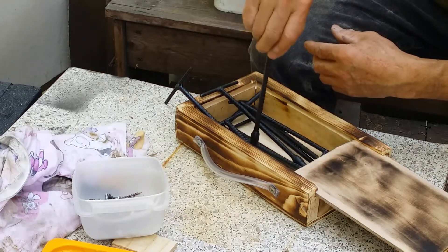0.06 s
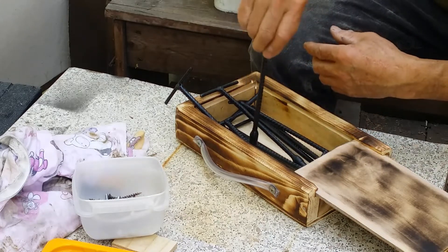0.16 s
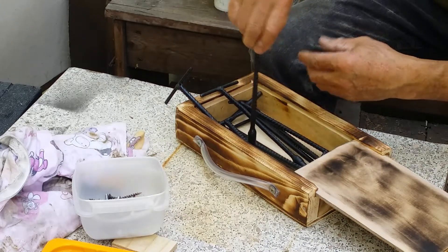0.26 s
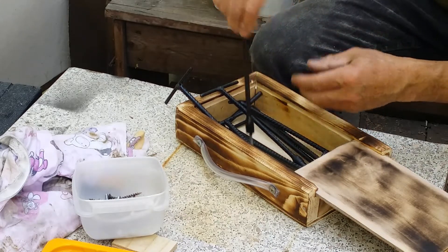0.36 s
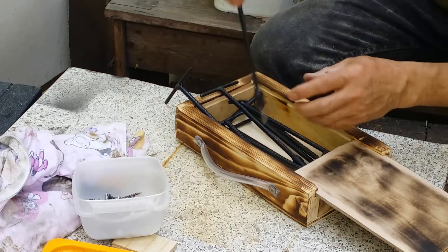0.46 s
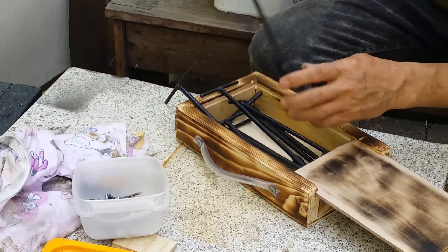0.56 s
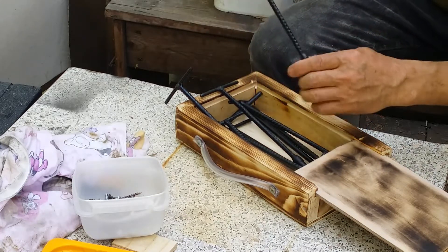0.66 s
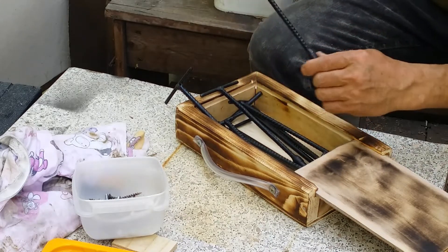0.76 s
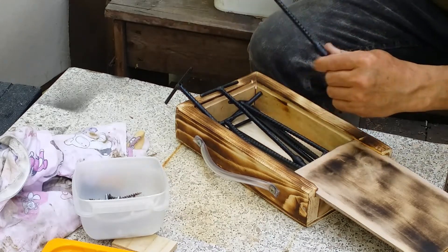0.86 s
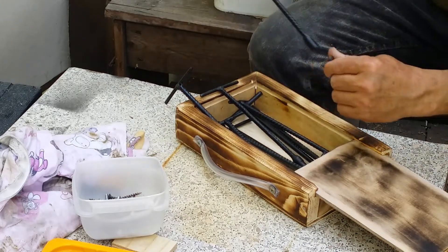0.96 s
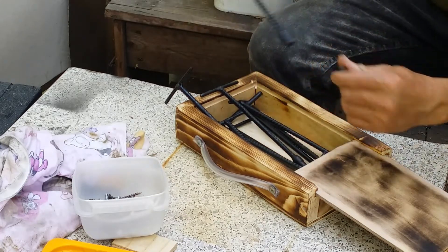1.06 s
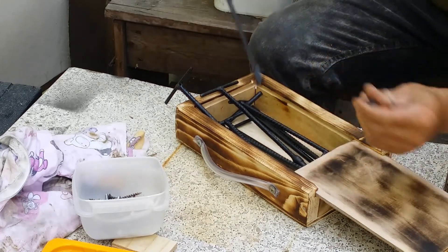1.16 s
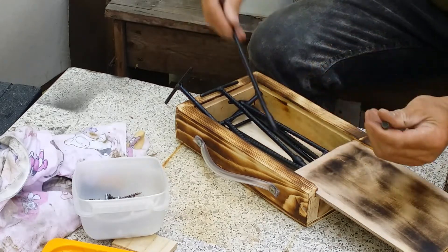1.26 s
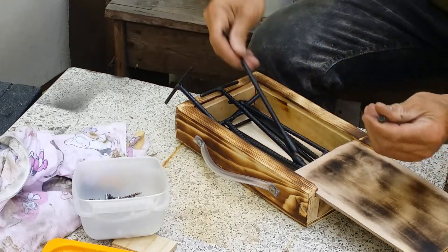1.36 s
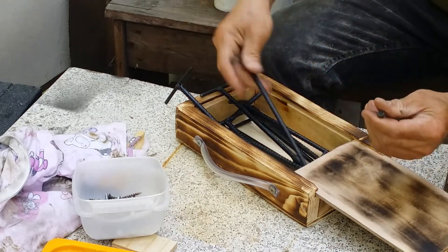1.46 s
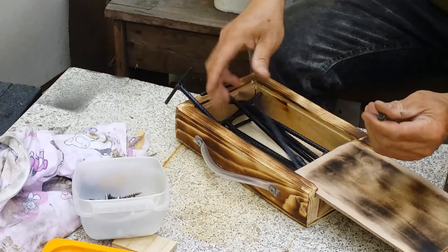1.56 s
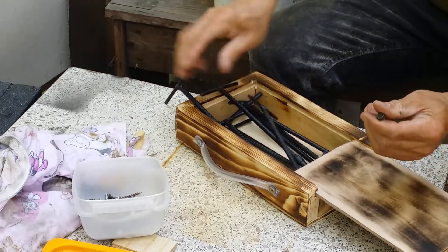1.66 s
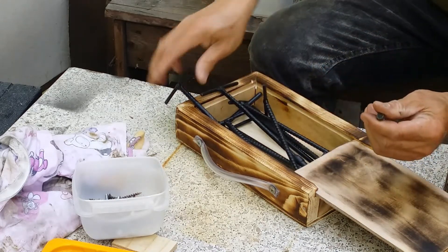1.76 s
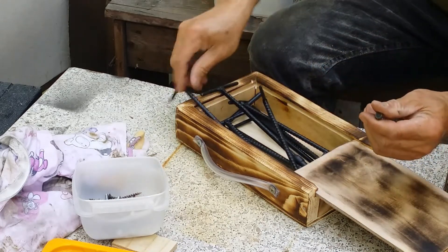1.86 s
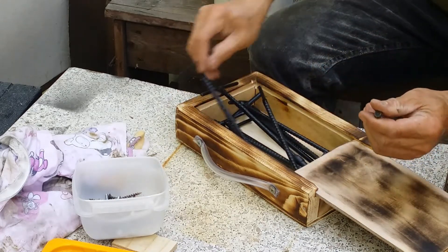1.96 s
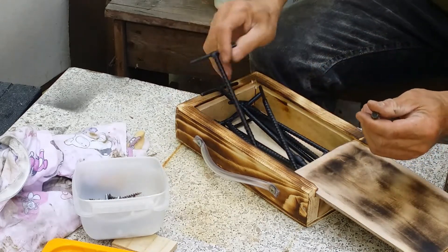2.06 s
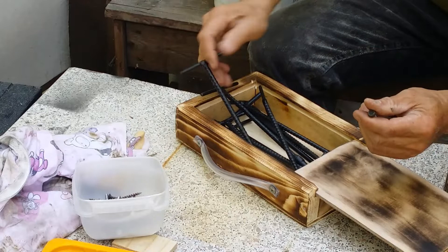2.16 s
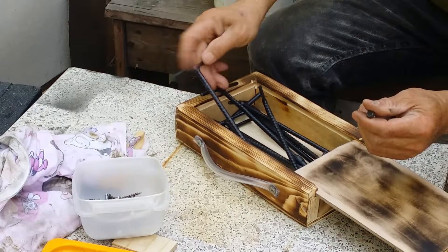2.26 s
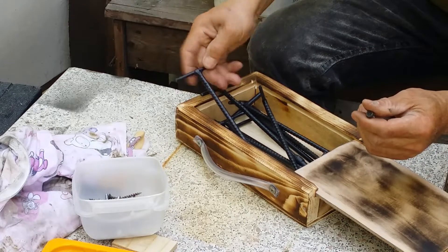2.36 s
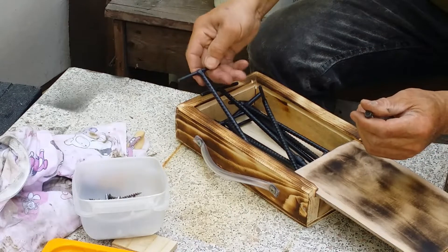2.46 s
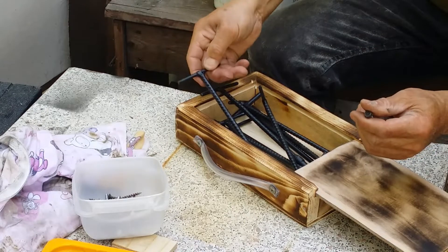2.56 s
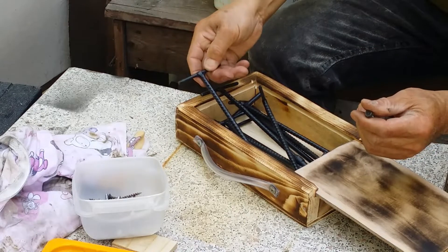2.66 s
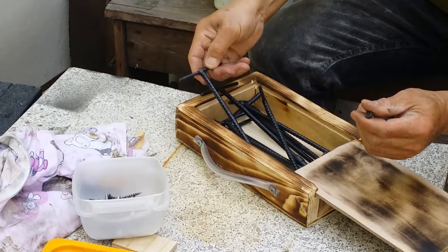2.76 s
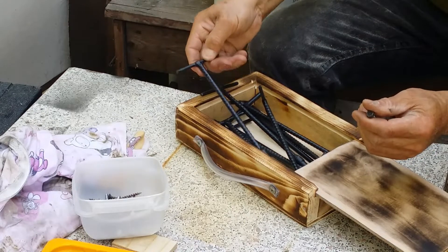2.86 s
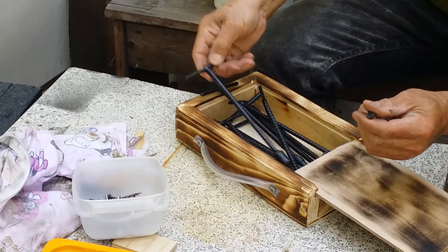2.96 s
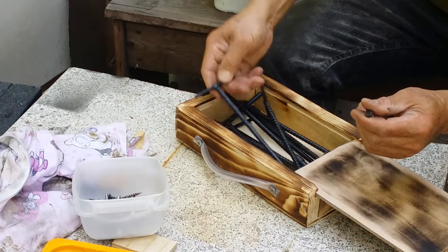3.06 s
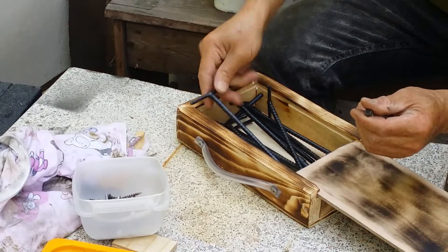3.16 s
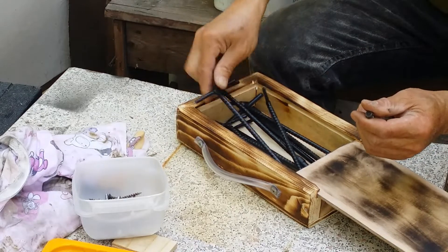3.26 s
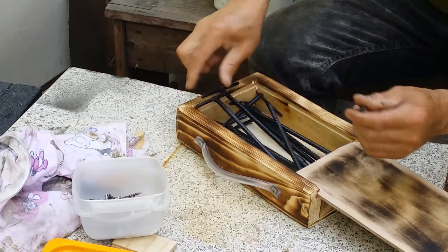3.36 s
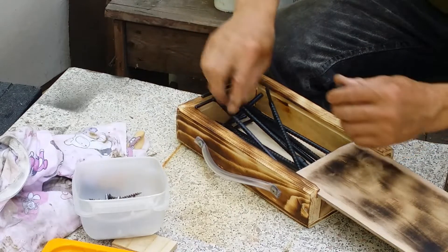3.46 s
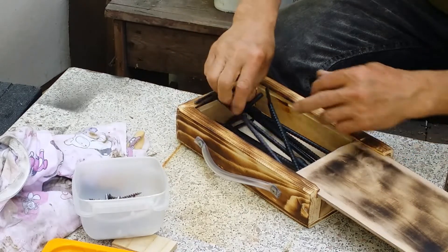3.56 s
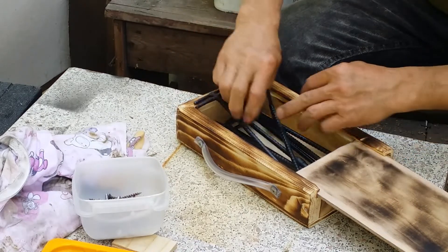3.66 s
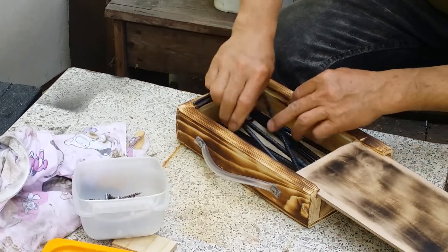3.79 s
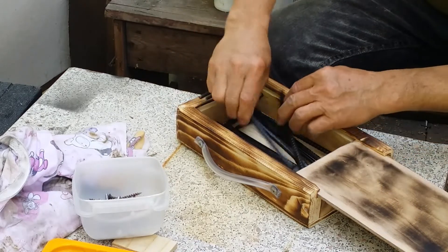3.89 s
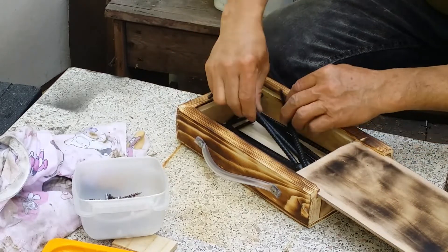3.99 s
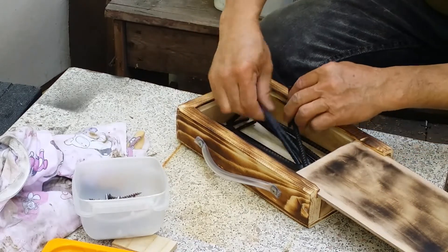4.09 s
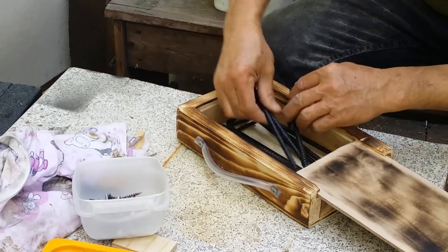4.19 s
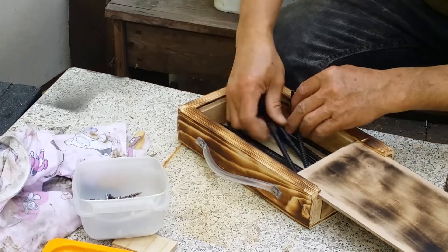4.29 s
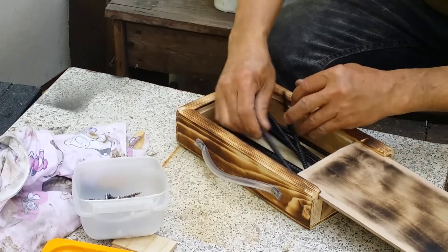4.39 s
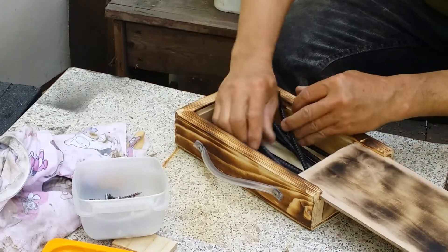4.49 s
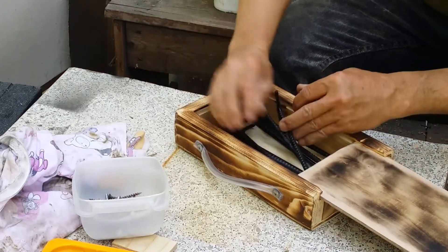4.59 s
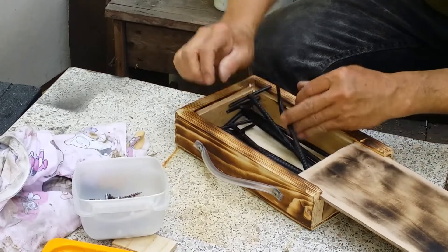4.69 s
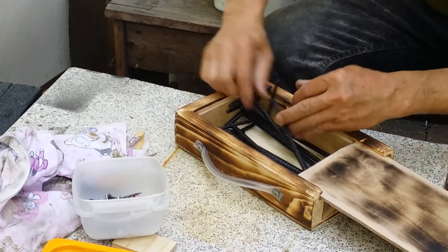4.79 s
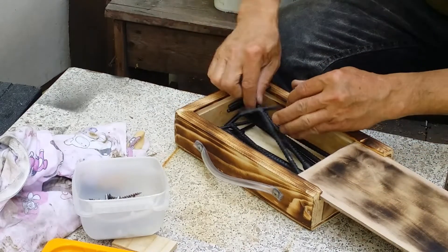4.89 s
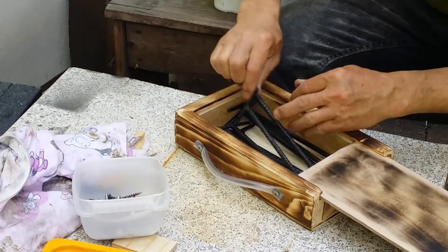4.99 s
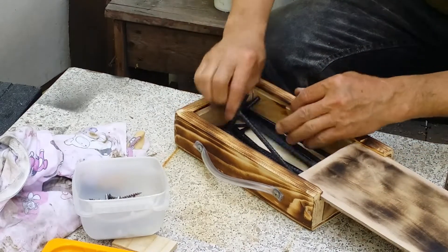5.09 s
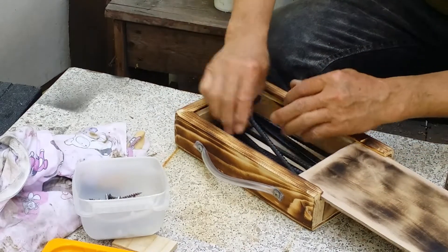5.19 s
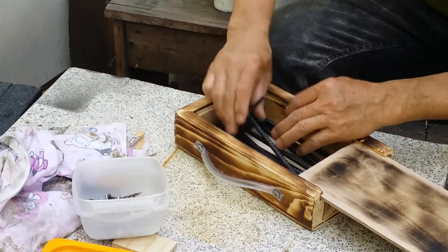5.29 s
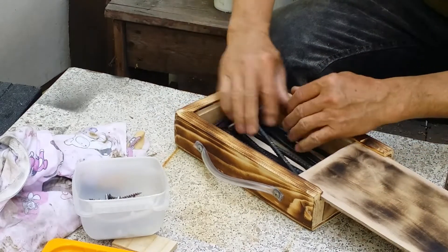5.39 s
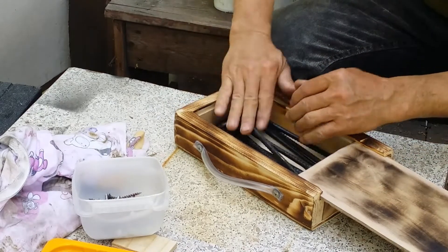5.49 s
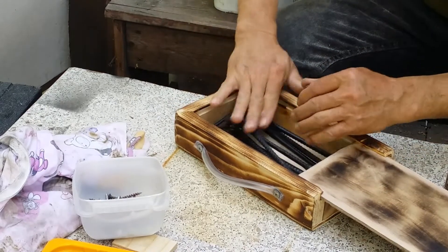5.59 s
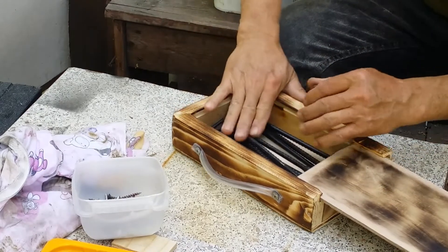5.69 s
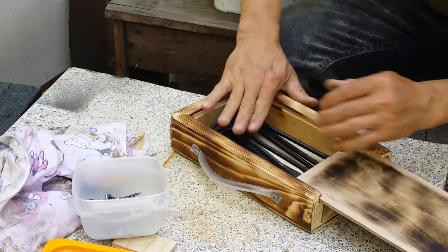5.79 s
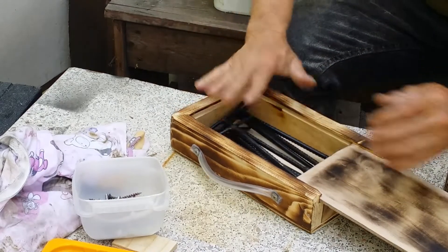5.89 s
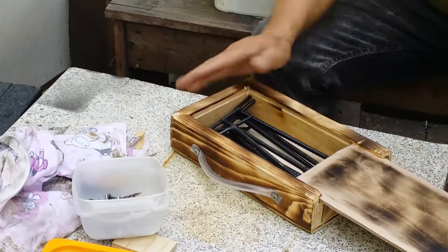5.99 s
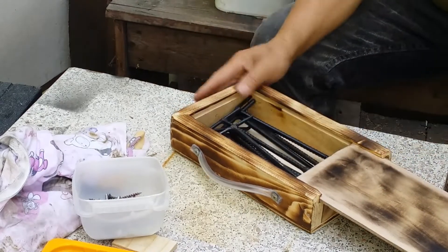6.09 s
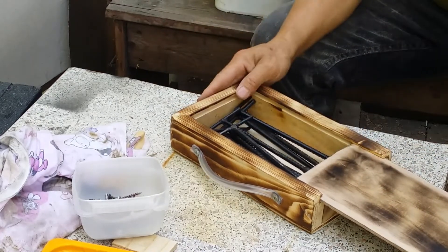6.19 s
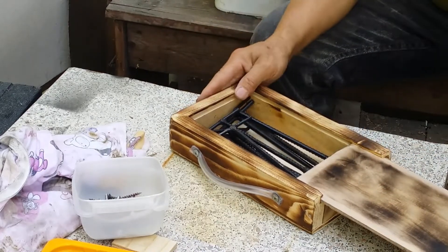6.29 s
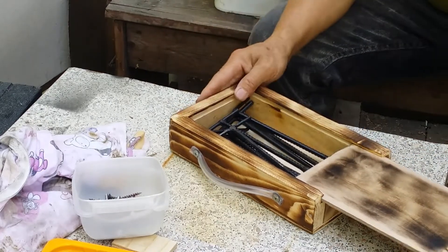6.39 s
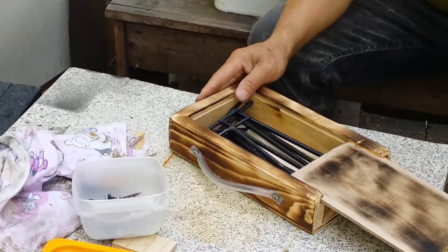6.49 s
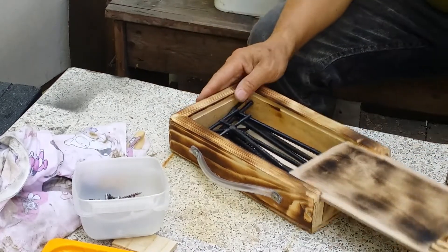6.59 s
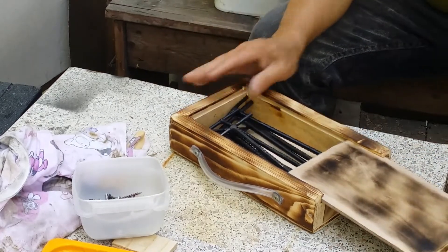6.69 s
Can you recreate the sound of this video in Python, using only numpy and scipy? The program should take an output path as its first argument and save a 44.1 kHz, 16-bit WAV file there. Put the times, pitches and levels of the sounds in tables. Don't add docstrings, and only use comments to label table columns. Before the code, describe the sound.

A quiet workshop, near silent: low soft hush, a barely audible dull knock at the start, distant rising bird whistles around 0.6 to 1.1 seconds and faint hand brushing. At about 1.65 steel rods hit a wooden box close by: sharp clacks, a strong strike at 1.73 with a clear ring lasting half a second, and chattering scrape until 2.1. A lull follows, with soft brushing at 2.5 and a bird at 2.8. Small clinks resume at 3.15, then a very sharp bright crack near 3.48. More clinks at 3.7, a heavy knock at 4.08, rubbing and rattling to 4.5, and a single clack at 4.73. From 4.93 to 5.9 comes dense clatter with scraping, woody thuds and low table booms; a bird whistles faintly at 5.4. Then quiet, light hand brushing, and small knocks from 6.4 to 6.7. Echo is short and dry.

```python
import sys
import numpy as np
from scipy import signal
from scipy.io import wavfile
from scipy.ndimage import uniform_filter1d

SR = 44100
rng = np.random.default_rng(int(sys.argv[2]) if len(sys.argv) > 2 else 0)


def amp(db):
    return 10 ** (np.asarray(db, float) / 20)


def write(x):
    x = np.atleast_2d(x).T
    wavfile.write(sys.argv[1], SR, np.round(np.clip(x, -1, 1) * 32767).astype(np.int16))


N = 297234

# pitch_hz, level_db (per Hz)
AIR_COLOUR = [(15, -45), (25, -14), (62, -18), (99, 7), (195, -11), (270, 4), (344, -9), (489, -5),
              (531, -22), (575, -7), (1890, -16.5), (4870, -21.5), (5880, -14.5), (9840, -27),
              (14800, -23.5), (16000, -49)]
# time_s, level_db
AIR_LEVEL = [(0, -68), (1.5, -65), (2.4, -61.5), (6.0, -60.5), (6.74, -60.5)]
# pitch_hz, likeness (-1 to 1)
AIR_LIKENESS = [(60, 1), (240, 0.74), (950, -0.11), (3770, -0.16), (15000, -0.047)]
# pitch_hz, level_db (per Hz)
STEEL_COLOUR = [(530, -34), (900, 3), (1920, -0.5), (3910, -1), (4570, -2), (6640, -4.5), (8870, -20.5),
                (10900, -24), (12300, -39), (14000, -25), (16000, -36)]
# pitch_hz, width_hz, level_db
BOX_PANELS = [(125.2, 5.1, -23), (167.4, 7, -23), (254, 81, -4), (277, 50, -4.5), (395, 33.4, -10.5),
              (477, 58, -1.5), (668, 40, -11.5), (801, 83, 0), (1009, 116, 0.5), (1300, 137, -2.5)]
# start_s, crack_db, box_db, rebound_t60_s, tilt_db (per octave)
DROPS = [(0.0455, -45, -45, 0.059, 0.6), (1.5993, -42.5, -57, 0.036, -6.5), (1.6602, -31, -36, 0.072, 0.5),
         (1.7001, -43, -42, 0.27, -2), (1.732, -18, -30.5, 0.052, -.1), (1.9494, -41.5, -49, 0.022, 0.2),
         (2.0257, -39, -37, 0.05, -2.5), (2.361, -58.5, -60.5, 0.1, -1), (2.9503, -50, -84, 0.064, -0.5),
         (2.9891, -53, -57, 0.2, -2), (3.1387, -38.5, -64, 0.054, 0), (3.2114, -28.5, -59, 0.092, -4),
         (3.412, -50, -59, 0.032, -6), (3.6891, -28.5, -42.5, 0.09, -.1), (3.9827, -39, -41.5, 0.037, -1.5),
         (4.057, -31, -38.5, 0.17, 0), (4.0783, -13, -29, 0.036, 1), (4.2023, -40.5, -44.5, 0.15, -3),
         (4.257, -52, -39.5, 0.032, 2)]
# start_s, crack_db, box_db, rebound_t60_s, tilt_db (per octave)
PUSHES = [(4.3474, -26, -34, 0.1, -3), (4.388, -28.5, -54, 0.053, 0.8), (4.4084, -39, -44, 0.1, 2),
          (4.5188, -48, -38.5, 0.026, -3), (4.9309, -27, -42, 0.042, 0.2), (4.9878, -24, -40, 0.068, 1.5),
          (5.0304, -21.5, -32.5, 0.035, 1), (5.0447, -22, -35, 0.031, 0), (5.3277, -25, -35.5, 0.03, 3),
          (5.4651, -35, -36.5, 0.026, 0.2), (5.6088, -37, -39, 0.062, 1),
          (5.6292, -35.5, -34.5, 0.029, -.1), (5.675, -40, -40, 0.033, -.1),
          (5.6885, -23, -32, 0.025, -0.5), (5.7107, -21.5, -37.5, 0.05, -1.5),
          (5.7722, -26, -36, 0.047, -2), (5.8002, -24.5, -39, 0.052, -0.5), (6.3678, -48, -81, 0.036, 1),
          (6.4082, -50.5, -48.5, 0.033, -.1), (6.6252, -34, -39.5, 0.074, 0), (6.7294, -43, -44, .08, -.1)]
# start_s, crack_db, box_db, rebound_t60_s, tilt_db (per octave)
CLINKS = [(1.641, -22.5, -47, 0.032, -2), (1.7891, -28, -52, 0.078, -0.3), (1.8099, -35, -43, 0.033, 1),
          (1.8488, -37, -76, 0.055, -.1), (1.9101, -35, -43.5, 0.068, 0.3), (3.1575, -46, -75, 0.12, -2),
          (3.1983, -41.5, -47.5, 0.028, -1), (3.2197, -52, -36, 0.032, -.1), (3.3389, -55, -53, .046, -.1),
          (3.4615, -31, -43, 0.077, -.1), (3.478, -19, -61, 0.047, 1), (3.5023, -30.5, -41.5, 0.088, 1.5),
          (3.682, -42, -55, .03, -.1), (3.7184, -33.5, -43.5, 0.073, 1), (3.7574, -31, -50, 0.03, 0.3),
          (3.7948, -38.5, -62, 0.088, -.1), (4.0304, -48, -66, 0.1, -.1), (4.3136, -30.5, -42, 0.097, 0.3),
          (4.3323, -27, -47, 0.026, 0.5), (4.4352, -23, -34, .11, -2), (4.728, -22, -33.5, 0.037, -.1),
          (4.957, -29, -65, 0.33, -1), (5.0732, -21, -36, 0.095, -0.3), (5.099, -30, -44, .05, -0.5),
          (5.1989, -25, -30, 0.05, -1), (5.238, -22, -39, 0.09, 0.3), (5.3488, -26.5, -38, 0.076, 1),
          (5.529, -26, -35, .03, 3), (5.5325, -19.5, -29, 0.044, 1), (5.5487, -26.5, -33, 0.053, 1),
          (6.5132, -47.5, -66, 0.3, -0.2)]
# crack_centre_hz, sparkle_db
DROP_COLOUR, PUSH_COLOUR, CLINK_COLOUR = (1620, -2.5), (1730, 2.6), (4540, 3.2)
# start_s, peak_db, centre_hz
SNAPS = [(1.6395, -24, 6660), (1.731, -18.5, 3840), (3.4625, -18.5, 4400), (3.477, -7.5, 5330),
         (3.503, -21, 5460), (3.6882, -28.5, 4900), (4.0575, -27, 6610), (4.0776, -17, 2200),
         (4.4363, -24, 6620), (4.7277, -24, 6650), (5.0728, -23, 4630), (5.1994, -22, 4460)]
# start_s, length_s, first_pitch_hz, sweep_db, closing_flick_db
WHISTLES = [
    (0.606, 0.14, 3100, -54, -57),
    (0.815, 0.093, 1380, -63, -43),
    (1.065, 0.058, 2440, -62.5, -49),
    (2.786, .13, 3040, -55, -53.5),
    (5.381, 0.086, 3050, -47, -48),
]
# middle_s, length_s, hiss_db, rustle_db
BRUSHES = [
    (0.93, 0.54, -71, -69.5),
    (2.548, 0.39, -68, -67),
    (4.266, 0.11, -49, -50.5),
    (4.646, 0.28, -61.5, -55),
    (4.824, 0.25, -78, -58),
    (5.956, 0.09, -57.5, -63),
    (6.107, 0.29, -116, -84),
    (6.282, 0.14, -62.5, -66),
    (6.389, 0.098, -57.5, -61.5),
    (6.562, 0.15, -59, -56.5),
]
# pitch_hz, level_db, t60_s
LONG_ROD = [(3800, -8, .09), (4520, -7, .15), (4689, 0, .28), (4800, -7, .15), (4969, -2, .78),
            (5070, -7, .15), (7590, -7, .25)]
STOUT_ROD = [(6620, -3, .3), (7570, -4, .25), (9775, -11, .4), (10880, -7, .3), (10540, -14, .12),
             (13470, -17, .3), (14280, -22, .25)]
BENT_ROD = [(1590, -18, .15), (2900, -18, .3), (3952, 0, .6), (6616, -3, .7)]
LOOSE_ROD = [(4253, -3, 1.1)]
SHORT_ROD = [(4900, 11.5, 0.067), (6800, 6, 0.16), (9700, -0.5, 0.29), (11200, -7, 0.28),
             (13900, -18, 0.075)]
FLAT_ROD = [(4100, -8, .1), (6640, -4, .25), (9700, -11, .25), (13560, -1, .2), (13830, -3, .2)]
THIN_ROD = [(7230, -2, .14), (10780, 2, 0.11), (11970, -9, 0.13), (13610, -6, 0.092), (14370, -3, 0.1)]
# pitch_hz, level_db, t60_s
PINNED_ROD = [(505.5, -10, 0.14), (850, -15, .15), (1044, -0.5, 0.11), (1367, -5, .15), (2200, -4, 0.17),
              (3639, -10, 0.13), (5841, -14, .12)]
PINCHED_ROD = [(5480, -3.5, .13), (6621, -3, 0.24), (7585, -11, .16), (9740, -22, 0.43), (10410, -15, .12),
               (14350, -14, 0.11), (14910, -14, .07)]
TIPPED_ROD = [(1013, -6, .15), (1370, -4, 0.097), (3230, -9, .08), (4888, -3, 0.44), (7300, -8, .09),
              (7607, -14.5, 0.36), (10910, -16, .3), (13600, -29.5, .2)]
CROSSED_ROD = [(3650, -3, 0.071), (4969, -3, 0.21), (5060, -1, .25), (6670, -6.5, .5), (7250, -10, .25),
               (7585, -2.5, 0.22), (9814, -8, .16), (10930, -14, .3), (13550, -19, .3), (14930, -14, .07)]
# start_s, level_db, hold_s (until damped), tilt_db (per octave, from the place struck), rod
FREED = [(1.641, -49.5, .07, 0.5, SHORT_ROD), (1.732, -32.5, 0.12, 5, STOUT_ROD),
         (1.731, -36.5, .55, -3, LONG_ROD), (1.79, -40, 0.033, -5, LONG_ROD),
         (1.745, -46, .22, -6, BENT_ROD), (1.909, -43.5, 0.024, 21.5, LONG_ROD),
         (3.155, -50, 0.077, 11, LONG_ROD), (3.213, -59, 0.23, -6, LOOSE_ROD),
         (3.213, -40, 0.076, 0.3, TIPPED_ROD), (4.079, -29, .05, -.1, PINNED_ROD),
         (3.757, -45.5, .06, -1, CROSSED_ROD), (3.719, -38.5, 0.04, -.1, CROSSED_ROD),
         (3.796, -50.5, 0.05, 4, CROSSED_ROD), (3.81, -53, .12, 3, BENT_ROD),
         (4.438, -33, 0.029, -5, STOUT_ROD), (4.727, -37.5, 0.012, 3.5, FLAT_ROD),
         (3.479, -30.5, 0.07, -1, PINCHED_ROD), (4.958, -44, 0.087, 7, STOUT_ROD),
         (5.074, -50, 0.11, -32, SHORT_ROD), (5.239, -37.5, .08, 1.5, THIN_ROD),
         (5.532, -48, 0.03, 3, FLAT_ROD), (4.96, -52, .08, 5, FLAT_ROD), (5.71, -48.5, 0.13, 24, BENT_ROD)]
# start_s, end_s, chatter_db (steel), rumble_db (box), change_db (by the end)
HANDLING = [(1.652, 2.127, -48.5, -42.5, -19.5), (2.877, 3.1, -88, -70, 1), (3.145, 3.447, -62, -50, -17),
            (3.69, 3.943, -51.5, -46, -17.5), (3.964, 4.526, -61.5, -52, -4),
            (4.938, 5.146, -56.5, -48.5, 1.5), (5.195, 5.428, -61, -52.5, 5.5),
            (5.46, 5.725, -61, -58, 11.5), (5.753, 5.899, -48, -43.5, -9), (6.4, 6.635, -83, -86, 24),
            (6.625, 6.74, -54.5, -47, -13)]
# start_s, peak_db, panel_hz
THUDS = [
    (1.6999, -24.5, 567),
    (2.0245, -31.5, 474),
    (4.077, -43, 1050),
    (4.387, -32.5, 606),
    (4.407, -26, 745),
    (5.042, -25, 840),
    (5.199, -32.5, 270),
    (5.773, -27.5, 298),
    (5.8, -39, 700),
]
# start_s, level_db, pitch_hz, t60_s
BOOMS = [
    (1.742, -44, 123, .9),
    (2.029, -57, 107, .9),
    (3.701, -51, 132, .9),
    (4.078, -35, 270, .16),
    (4.135, -46, 130, .3),
    (4.258, -45, 490, .12),
    (4.728, -37, 495, .12),
    (5.2, -42, 270, .2),
    (5.6, -35.5, 222.3, .3),
    (5.799, -48, 97.8, .9),
]
# start_s, peak_db, centre_hz
TICKS = [(1.76, -28, 4700), (1.787, -28, 3900), (1.803, -30, 4800), (3.2125, -44, 12500),
         (3.478, -24, 14800), (3.49, -23, 4300), (3.721, -31, 5000), (3.757, -29, 5000), (4.03, -43, 5000),
         (4.0785, -22, 5800), (4.3136, -32, 6300), (4.387, -30, 5500), (4.407, -35, 6000),
         (4.9885, -23, 5200), (5.03, -28, 6200), (5.322, -34, 7300), (5.688, -29, 4500), (5.772, -30, 4800)]


def evened(x):
    return x / np.sqrt(np.mean(x ** 2) + 1e-20)


def read(points, hz):
    f, value = np.transpose(points)
    return np.interp(np.log(hz + 1), np.log(f + 1), value)


def add(mix, s, sound):
    part = mix[:, round(s * SR):][:, :sound.shape[1]]
    part += sound[:, :part.shape[1]]


def air():
    frames, hz = N // 256 + 5, np.fft.rfftfreq(1024, 1 / SR)
    a, b, c, d, patches = rng.standard_normal((frames, 513, 5)).T
    patches = uniform_filter1d(patches, 10, 0)
    patches = evened(uniform_filter1d(patches, 14, 1))
    same = np.clip(read(AIR_LIKENESS, hz), -1, 1)[:, None]
    left = a + 1j * b
    right = same * left + np.sqrt(1 - same ** 2) * (c + 1j * d)
    z = np.array([left, right]) * amp(read(AIR_COLOUR, hz)[:, None] + 0.8 * patches)
    hush = evened(signal.istft(z, nperseg=1024, noverlap=768)[1][:, :N])
    return hush * amp(np.interp(np.arange(N) / SR, *np.transpose(AIR_LEVEL)))


def modes(hz, db, t60, turn, count, rise=0.00047):
    t = np.arange(count) / SR
    step = np.exp((2j * np.pi * hz - np.log(1000) / t60) / SR)
    spin = np.cumprod(np.broadcast_to(step[:, None], (len(hz), count)), axis=1)
    start = amp(db) * np.exp(1j * np.array([turn, -turn]))
    return (start @ spin).imag * np.minimum(t / rise, 1)


def steel(chance, hz, sparkle_db, life=0.0049, focus_db=1.5, spread=0.71, rise=0.00053, tilt_db=0):
    place = (np.arange(len(chance)) + chance[:, 0]) / len(chance)
    f = 700 + 15000 * place ** 1.3
    octaves, top = np.log2(f / hz), f > 9000
    db = read(STEEL_COLOUR, f) + 7 * chance[:, 1]
    db -= focus_db * np.minimum(abs(octaves), 2.6)
    db -= 1.9 * np.maximum(-octaves, 0)
    db += sparkle_db * top + tilt_db * octaves
    t60 = life * (0.15 + 2.54 * chance[:, 2]) * np.where(top, 2.59, 1)
    turn = spread * (chance[:, 3] - 0.5) * np.pi
    sound = modes(f, db, t60, turn, count=1500, rise=rise)
    return sound / abs(sound).max()


def wood(chance, ring=1.0, near_hz=500, focus_db=0):
    hz, width, db = np.transpose(BOX_PANELS)
    f = hz * (0.918 + 0.26 * chance[:, 0])
    db = db + 9 * chance[:, 1] - focus_db * abs(np.log2(hz / near_hz))
    t60 = np.clip(ring * 1.79 / width, 0.012, 0.2)
    sound = modes(f, db, t60, 0.124 * (chance[:, 2] - 0.5), count=5000, rise=0.00086)
    return sound / np.sqrt(np.mean(sound[:, :900] ** 2))


def bounces(draw, t60, share_db=-6.5, per_s=2500):
    t = np.arange(draw.shape[1]) / SR
    fade = amp(share_db - 60 * (t / np.clip(t60, 0.01, 0.3)) ** 1.43)
    train = fade * (2 * draw[0] - 1) * (draw[1] < per_s / SR)
    return np.append(1, train[1:])[None]


def knocks():
    out = np.zeros((2, N))
    kinds = (DROPS, DROP_COLOUR), (PUSHES, PUSH_COLOUR), (CLINKS, CLINK_COLOUR)
    contacts = sorted((*row, *colour) for table, colour in kinds for row in table)
    for s, db, box_db, t60, tilt_db, hz, sparkle_db in contacts:
        chance = rng.random((60, 4))
        train = bounces(rng.random((2, 6000)), t60)
        crack = signal.fftconvolve(train, steel(chance, hz, sparkle_db, tilt_db=tilt_db), axes=1)
        thud = signal.fftconvolve(train[:, :2000], wood(chance[:len(BOX_PANELS)]), axes=1)
        add(out, s, amp(db + 5.5) * crack)
        add(out, s, amp(box_db - 8.0) * thud)
    for s, db, hz in SNAPS:
        snap = steel(rng.random((60, 4)), hz, 14 + 0.5 * db, life=0.003, focus_db=13, spread=0.35, rise=0.0002)
        add(out, s + 0.0007, amp(db + 3.0) * snap)
    return out


def room(x, t60, top_t60, gap, bend=1):
    hz, t, z = signal.stft(rng.standard_normal((2, SR // 2)), SR, nperseg=256)
    same = np.clip(read([(450, 0.73), (1100, 0.042)], hz), 0, 1)[:, None]
    z = np.array([z[0], same * z[0] + np.sqrt(1 - same ** 2) * z[1]])
    lives = read([(300, t60), (12000, top_t60)], hz)[:, None]
    tail = signal.istft(z * amp(-60 * (t / lives) ** bend), SR, nperseg=256)[1]
    tail = np.pad(tail / np.linalg.norm(tail[0]), ((0, 0), (round(gap * SR), 0)))
    return signal.fftconvolve(x, tail, axes=1)[:, :N]


def bird():
    out = np.zeros((2, N))
    knee, flick = 0.58, 0.74
    for s, length, first_hz, db, flick_db in WHISTLES:
        u = np.arange(0, 1, 1 / (length * SR))
        hz = np.interp(u, [0, knee, flick, 1], [first_hz, 3740, 4360, 3930])
        levels_db = [db - 12, db - 3.5, db, flick_db, flick_db - 29]
        level_db = np.interp(u, [0, knee / 2, knee, flick, 1], levels_db)
        tone = amp(level_db) * np.sin(2 * np.pi * np.cumsum(hz) / SR)
        add(out, s, np.array([tone, tone]) * signal.windows.tukey(len(u), 0.1))
    return amp(-6) * out + room(out, 0.45, 0.4, 0.004)


def brushes():
    out = np.zeros((2, N))
    for s, length, hiss_db, low_db in BRUSHES:
        count = round(np.clip(length, 0.03, 0.55) * SR)
        noise = rng.standard_normal((3, SR // 2 + 4000))[:, :count]
        hiss = signal.lfilter(*signal.butter(2, [2200, 8500], "band", fs=SR), noise[:2])
        low = signal.lfilter(*signal.butter(1, [70, 420], "band", fs=SR), noise[2])
        swell = signal.windows.tukey(len(low), 0.8)
        add(out, s - length / 2, swell * (amp(hiss_db) * evened(hiss) + amp(low_db) * evened(low)))
    return out


def rings(split=0.004, twin_db=-10.0, pivot_hz=6000):
    out = np.zeros((2, N))
    for s, level_db, hold, tilt_db, rod in FREED:
        hz, db, t60 = np.transpose(rod)
        db = db + level_db + tilt_db * np.log2(hz / pivot_hz)
        detune, *turn = rng.uniform(-1.09, 1, (14, 3))[:len(hz)].T
        count = int(abs(hold) * SR) + 1500
        both_hz = np.append(hz, hz * (1 + split * detune))
        both_db = np.append(db, db + twin_db)
        both_t60 = np.clip(np.append(t60, 1.04 * t60), 0.03, 1.5)
        sound = modes(both_hz, both_db, both_t60, 0.9 * np.ravel(turn), count=count)
        damping = np.minimum(np.arange(count)[::-1] / 1500, 1)
        add(out, s, sound * damping)
    return out


def handling(per_s=1200, size_db=4.0, grip_s=0.019):
    t, out = np.arange(N) / SR, np.zeros((2, N))
    start, end, *levels, change_db = np.array(HANDLING).T[:, :, None]
    grip = np.clip(np.minimum(t - start, end - t) / grip_s + 1, 0, 1)
    grip = grip * amp(change_db * np.clip((t - start) / (end - start), 0, 1))
    for level_db, kind in zip(levels, ("steel", "wood")):
        layer = np.zeros((2, N))
        for chance in rng.random((4, 60, 4)):
            sizes = amp(size_db * np.minimum(rng.exponential(1, N), 5))
            contacts = sizes * (rng.random(N) < per_s / 4 / SR)
            if kind == "steel":
                body = steel(chance, 8100, 4.8, 0.0082)
            else:
                body = wood(chance[:len(BOX_PANELS)], 0.93)
            layer += signal.oaconvolve(contacts[None], body, axes=1)[:, :N]
        out += (amp(level_db) * grip).sum(0) * evened(layer)
    return out


def thuds(focus_db=9, swell=0.0067):
    out = np.zeros((2, N))
    for s, db, hz in THUDS:
        sound = wood(rng.random((len(BOX_PANELS), 3)), 1.0, hz, focus_db)
        add(out, s, amp(db + 3.5) * sound / abs(sound).max())
    for s, db, hz, t60 in BOOMS:
        add(out, s, modes(*np.array([[hz], [db], [t60], [0.1]]), count=SR // 2, rise=swell))
    return out


def sway(tools, level_db=-57, top_hz=85, follow_s=0.13):
    span = round(follow_s * SR)
    power = uniform_filter1d((tools ** 2).mean(0), span, origin=round(follow_s * SR / 4))
    work = np.sqrt(abs(power))
    low = signal.lfilter(*signal.butter(2, top_hz, fs=SR), rng.standard_normal(N))
    return amp(level_db) * np.sqrt(work / work.max()) * evened(low)


def ticks():
    out = np.zeros((2, N))
    for s, db, hz in TICKS:
        add(out, s, amp(db) * steel(rng.random((60, 4)), hz, 4, life=0.009, focus_db=11, spread=0.5))
    return out + amp(-1.5) * room(out, 0.1, 0.12, 0.003, bend=1.3)


def scene():
    struck, free = knocks(), amp(2.0) * rings()
    work = struck + handling() + thuds()
    tools = signal.lfilter(*signal.butter(2, 95, "high", fs=SR), work)
    side = amp(np.array([[-1.24], [1.24]]) / 2)
    echo = room(side * (amp(-0.5) * tools + amp(-9.0) * free), 0.11, 0.15, 0.003, bend=1.275)
    return side * (tools + free + sway(tools)) + echo + brushes() + bird() + air() + ticks()


def masked(x, below_db=24.5, from_hz=7800, count=16):
    hz, t, z = signal.stft(x, SR, nperseg=1024)
    power = abs(z[:, :512]) ** 2
    bands = power.reshape(2, -1, count, len(t)).sum(2).mean(0)
    loud = bands[7:].sum(0) * amp(-2 * below_db)
    loud = loud * (loud / loud.max()) ** 0.15
    z[:, :512] *= np.repeat(bands > loud, count, 0) | (hz[:512, None] < from_hz)
    return signal.istft(z, SR, nperseg=1024)[1][:, :N]


def top_cut(x):
    return signal.sosfilt(signal.butter(12, 16680, fs=SR, output="sos"), x)


def record(dry):
    thin = signal.lfilter(*signal.butter(2, 42, "high", fs=SR), dry)
    lowpass = signal.firwin(127, 16400, window=("kaiser", 6), fs=SR)
    limited = signal.oaconvolve(thin, lowpass[None], "same")
    return top_cut(masked(limited))


dry = scene()
out = record(dry)
write(out)
```